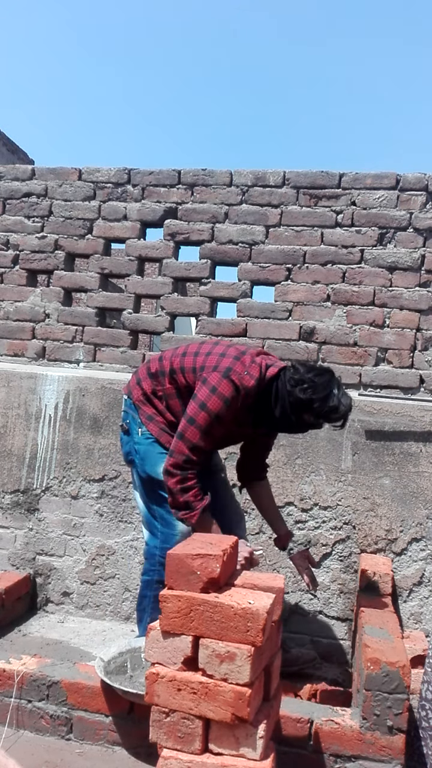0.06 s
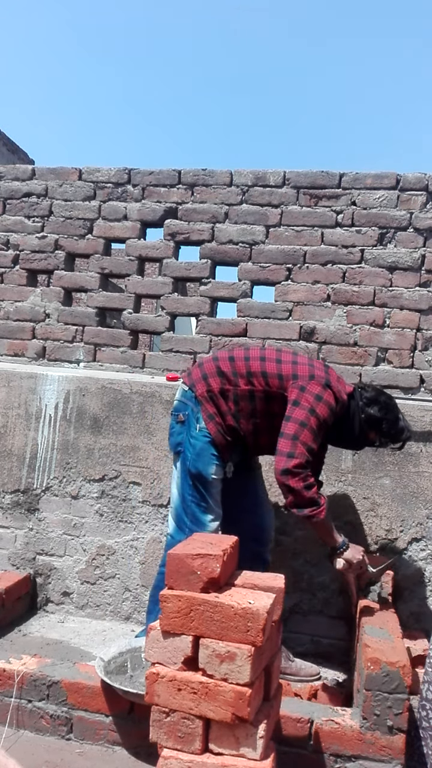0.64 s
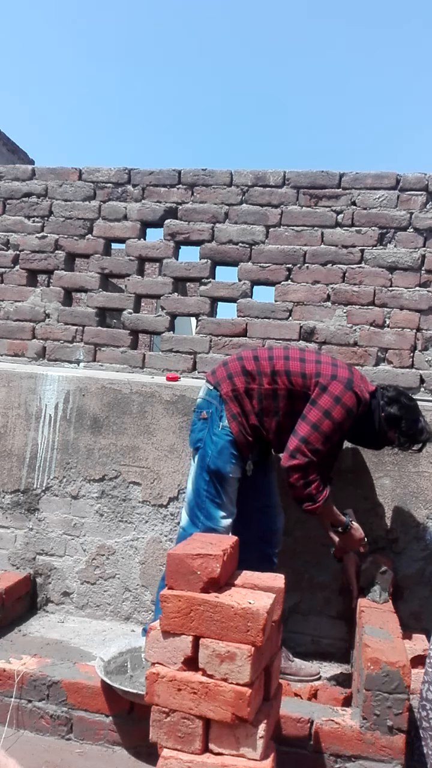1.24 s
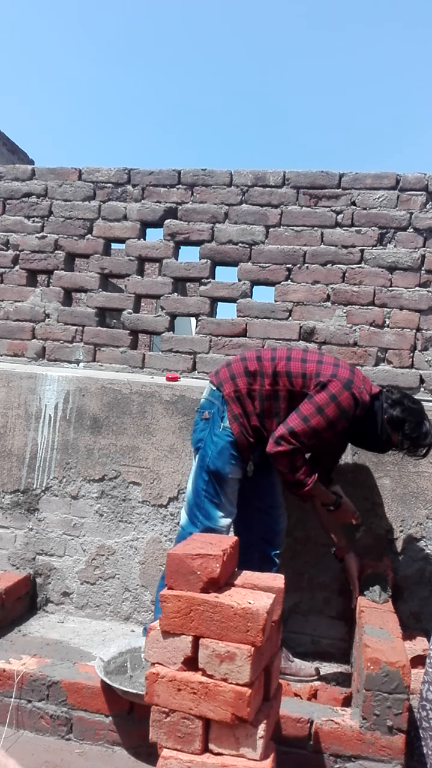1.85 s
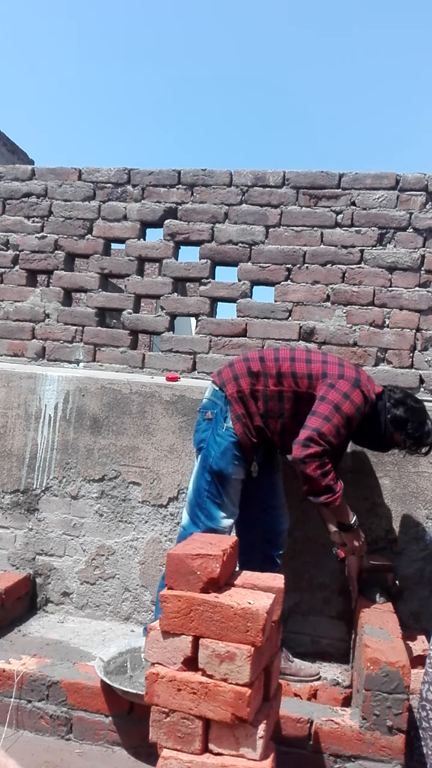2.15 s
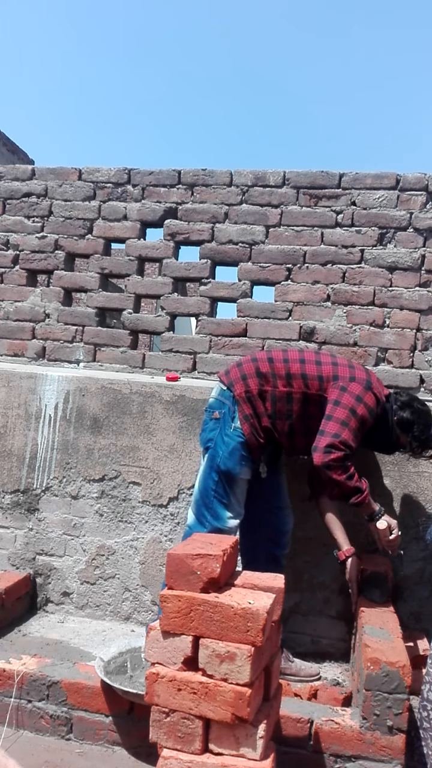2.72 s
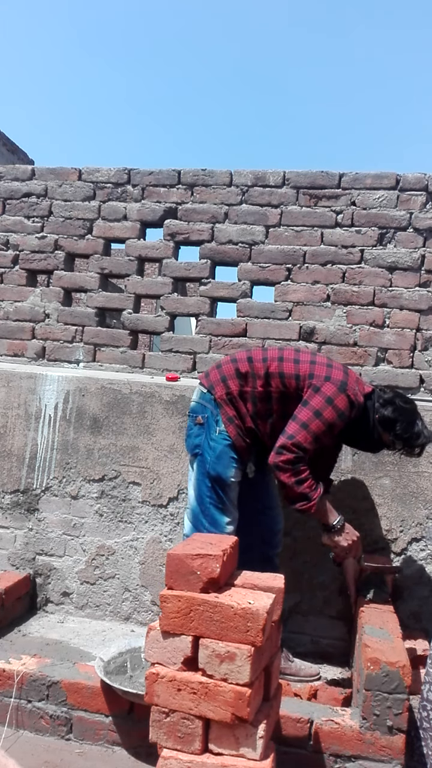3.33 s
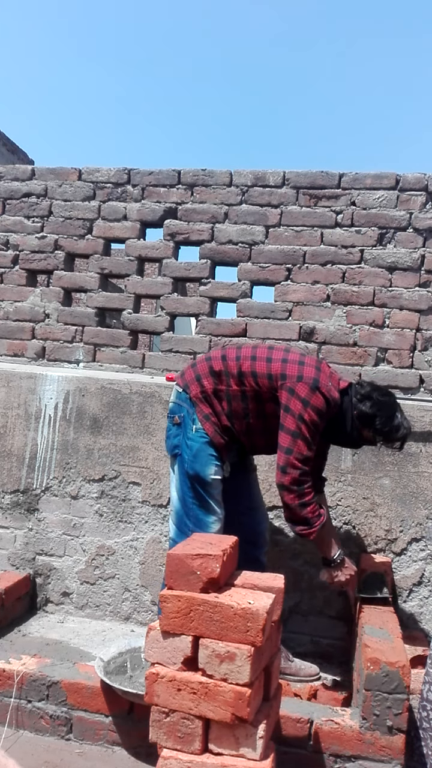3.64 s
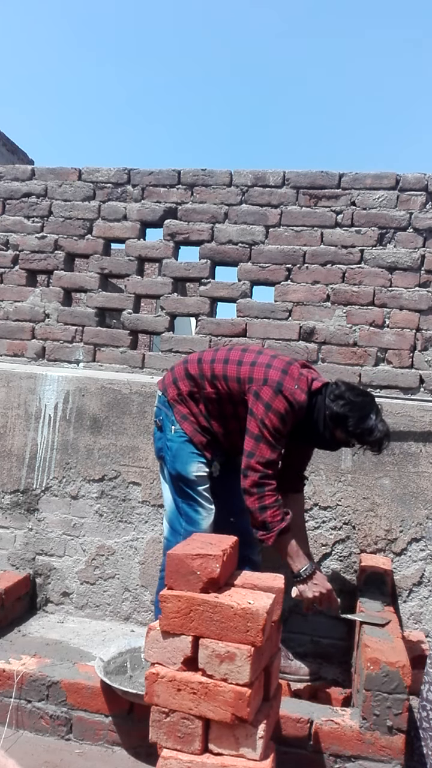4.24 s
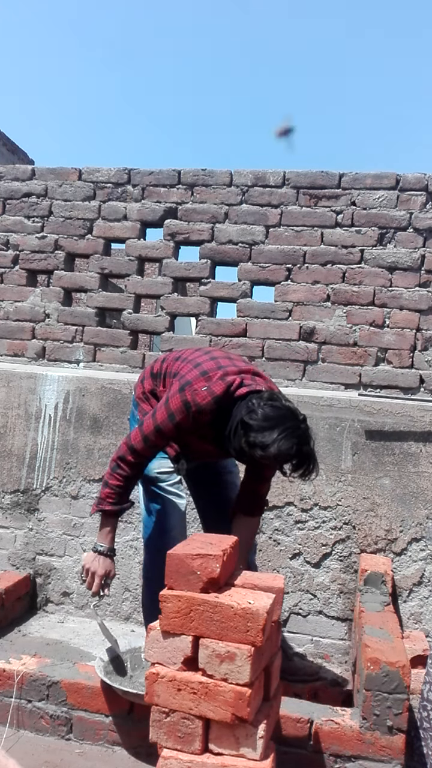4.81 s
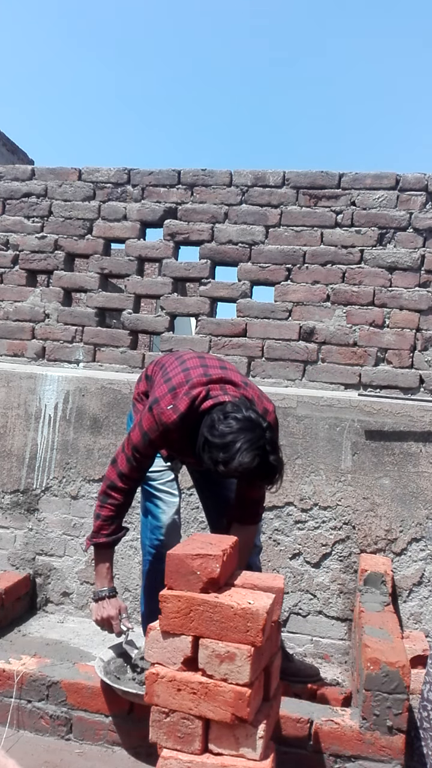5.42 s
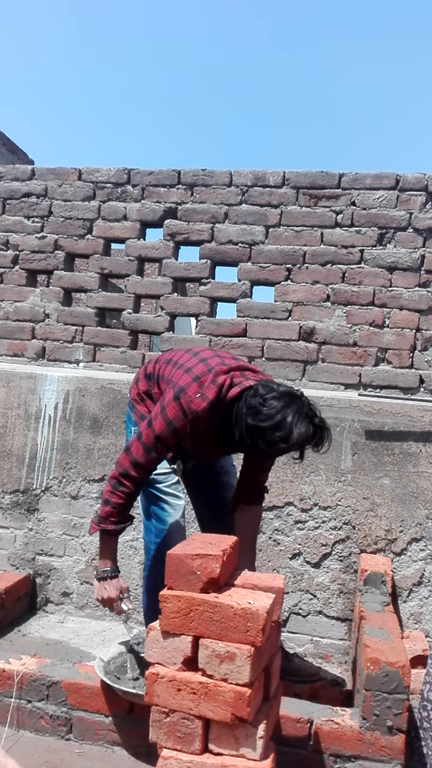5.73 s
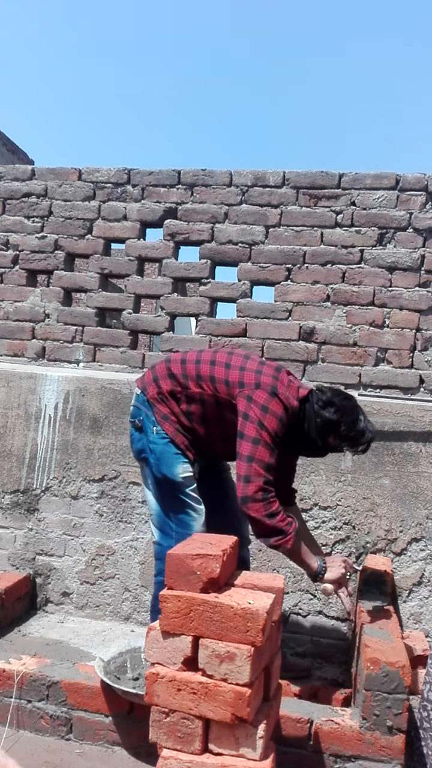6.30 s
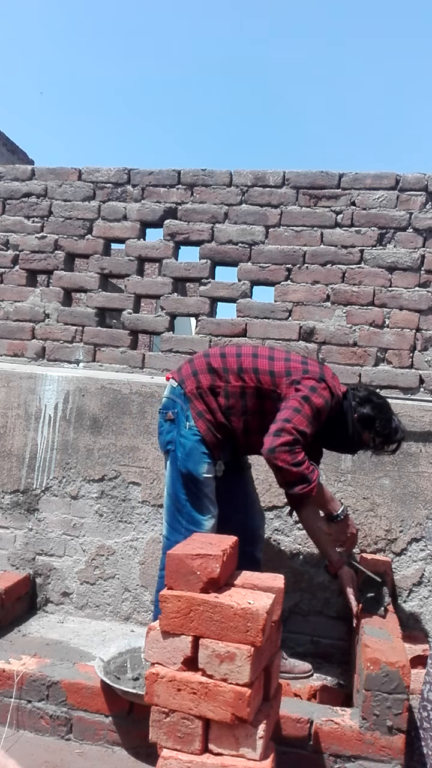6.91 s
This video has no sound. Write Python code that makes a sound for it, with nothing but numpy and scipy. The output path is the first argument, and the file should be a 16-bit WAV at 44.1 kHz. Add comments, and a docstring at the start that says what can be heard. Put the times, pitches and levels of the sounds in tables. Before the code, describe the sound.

A steel trowel knocks and scrapes on brick and scoops mortar from a metal pan, with birds chirping and a light breeze.

```python
"""Bricklaying in a walled corner

A steel trowel smears and pats mortar on to brick, knocks, rasps along an edge, then digs a scoop
from a metal pan: sand cracks under the blade, the metal rings and the walls answer. Birds call
around it in hoarse, wavering tones, a breeze buffets the microphone and the town rumbles far off."""
import sys
import numpy as np
from scipy import signal
from scipy.fft import rfft, irfft
from scipy.io import wavfile

SR = 44100
rng = np.random.default_rng(int(sys.argv[2]) if len(sys.argv) > 2 else 0)


def transcribe(u):
    """Save the signal u as a 16-bit wav file named by the first command-line argument.

    u: samples, shape (n,) or (channels, n), limited to [-1, 1]; the rate is SR.
    q: integer samples, one column per channel.
    """
    v = np.clip(np.atleast_2d(u).T, -1, 1)
    q = np.round(v * 32767).astype(np.int16)
    wavfile.write(sys.argv[1], SR, q)


N = 315756
TIME = np.arange(N) / SR


def from_db(db):
    """Decibels to gain."""
    return 10 ** (np.asarray(db) / 20)


def rms_one(x):
    """Scale to unit rms."""
    return x / np.sqrt(np.mean(np.abs(x) ** 2) + 1e-20)


def drift(rate_hz, size=N):
    """Smooth random modulator of unit rms."""
    pole = np.exp(-2 * np.pi * rate_hz / SR)
    wander = signal.lfilter([1], [1, -2 * pole, pole * pole], rng.standard_normal(size + 8000))
    return rms_one(wander[8000:])


def stroke(start, end, db, attack_s, release_s, swell_db=0):
    """Envelope: a rounded attack up to start, a hold that swells to db at end, an exponential release."""
    early = np.maximum(start - TIME, 0) / attack_s
    late = np.maximum(TIME - end, 0) / release_s
    to_go = np.clip((end - TIME) / max(end - start, 1 / SR), 0, 1)
    return from_db(db - swell_db * to_go) * np.exp(-np.minimum(early ** 2 + late, 30))


def burst(s, db, attack_s, release_s):
    """A stroke with no hold, peaking at s."""
    return stroke(s, s, db, attack_s, release_s)


def colour(x, spectrum, modes=(), ring_db=0, loss_db=0):
    """Unit-power, minimum-phase EQ: a broad curve plus resonances that lose loss_db per octave."""
    hz = np.maximum(np.fft.rfftfreq(8192, 1 / SR), 1)
    curve_hz, curve_db = np.array(spectrum).T
    peaks = sum(from_db(db + ring_db - loss_db * np.log2(f / 2000)) ** 2
                / (1 + (2 * (hz - f) / width) ** 2) for f, width, db in modes)
    gain = from_db(np.interp(np.log(hz), np.log(curve_hz), curve_db)) * np.sqrt(1 + peaks)
    cepstrum = irfft(np.log(gain))
    half = len(cepstrum) // 2
    response = irfft(np.exp(rfft(2 * cepstrum[:half], 2 * half)))[:half]
    return signal.oaconvolve(x, response / np.linalg.norm(response))[:N]


def grains(per_s, spread_db, friction):
    """Sand grains crack under steel, over smooth friction noise."""
    clicks = (rng.random(N) < per_s / SR) * rng.choice([-1, 1], N)
    sizes = from_db(spread_db * np.clip(rng.standard_normal(N), -2, 2))
    return rms_one(rms_one(clicks * sizes) + friction * rng.standard_normal(N))


def moving_echo(x, lag_s, wander, share):
    """The surface under the blade returns a close echo; its changing lag flanges the sound."""
    late = np.interp(TIME - lag_s * (1 + wander * drift(15.6)), TIME, x)
    return (x + share * late) / np.sqrt(1 + share ** 2)


# sub-heavy wind EQ: f/Hz, level/dB
BREEZE_EQ = [(15, 0), (34, 0), (55, -4.5), (82, -11), (110, -8.5), (170, -25), (400, -62.5), (2000, -100)]
# gust peaks: t/s, level/dB
GUSTS = [(0.252, -49), (0.348, -37), (0.665, -43.5), (.97, -48), (1.204, -42), (1.47, -39.5), (1.726, -43),
         (1.985, -50), (2.177, -35.5), (2.3, -45)]

def breeze():
    """Wind buffets the microphone: short gusts over a slowly easing bed."""
    bed = from_db(-52 - .5 * TIME)
    gusts = sum(from_db(db) * np.exp(-((TIME - s) / .05) ** 2) for s, db in GUSTS)
    return (bed + gusts) * colour(rng.standard_normal(N), BREEZE_EQ)


# low-end EQ of the town: f/Hz, level/dB
RUMBLE_EQ = [(50, -10.5), (115, 5.5), (190, 0), (260, -5), (340, -8.5), (450, -22), (800, -36),
             (3000, -73.5)]
# its booming resonances: f/Hz, width/Hz, level/dB
RUMBLE_MODES = [(137, 19, -1), (195, 14, 4), (328, 7, -3)]
# soft thuds: t/s, level/dB, decay/s
THUDS = [(1.2, -63.5, 0.1), (5.33, -49.5, 0.063), (6.04, -45, 0.12), (6.52, -49, 0.1), (6.91, -51, 0.41)]

def town_rumble():
    """The far town is a bed of low noise with dull thuds swelling out of it."""
    thuds = sum(burst(s, db, attack_s=.05, release_s=decay) for s, db, decay in THUDS)
    return (from_db(-63.5) + thuds) * colour(rng.standard_normal(N), RUMBLE_EQ, RUMBLE_MODES, ring_db=1)


# open-air EQ: f/Hz, level/dB
AIR_EQ = [(240, -24.5), (400, -4), (962, -6), (1670, -5.5), (2530, -11), (3780, -12.5), (14000, -22)]

def air():
    """A faint, steady outdoor hiss."""
    return from_db(-70) * colour(rng.standard_normal(N), AIR_EQ)


# syllables of a sharp chip: t/s, f/Hz, level/dB
CHIP_SYLLABLES = [(0.194, 3177, -37), (0.232, 3387, -33)]
# its partials: multiple of the pitch, level/dB
CHIP_PARTIALS = [(1, -11), (1.5, -9), (2, 5), (3, -9), (3.5, -33)]

def near_bird(trill_hz=61.93, rise_hz_per_s=2700, attack_s=.014):
    """A harsh chip: the pitch rises and shakes, the octave leads and half-harmonics add rasp."""
    shake = .045 * np.sin(2 * np.pi * trill_hz * TIME) + .0642 * drift(970)
    flutter = from_db(4.5 * drift(720))
    out = np.zeros(N)
    for s, hz, db in CHIP_SYLLABLES:
        pitch = hz + rise_hz_per_s * np.clip(TIME - s, -2 * attack_s, 0)
        phase = 2 * np.pi * np.cumsum(pitch * (1 + shake)) / SR
        tone = sum(from_db(part_db) * np.sin(multiple * phase) for multiple, part_db in CHIP_PARTIALS)
        out += burst(s, db, attack_s, release_s=.02) * rms_one(tone * flutter)
    return out


def call(s, length_s, pitch_hz, db, fall, hoarse_hz):
    """An arched whistle with a faint octave, roughened by fast random shaking of its pitch."""
    progress = np.linspace(0, 1, int(length_s * SR))
    size, at = len(progress), round(s * SR)
    arch = 4 * progress * (1 - progress)
    hz = pitch_hz * (1 + fall * (.5 - progress) + .025 * arch) + hoarse_hz * drift(330, SR)[:size]
    swell = np.sqrt(arch) * from_db(db + 3.5 * drift(110, SR)[:size])
    phase = 2 * np.pi * np.cumsum(hz) / SR
    tone = np.sin(phase) + from_db(-22) * np.sin(2 * phase)
    out = np.zeros(N)
    out[at:at + size] = (swell * tone)[:N - at]
    return out


# hoarse chatter: t/s, length/s, f/Hz, level/dB
CHATTER = [(.27, 0.19, 3120, -73.5), (.9, 0.34, 4390, -73.5), (.9, 0.37, 3263, -61.5),
           (1.31, 0.32, 3430, -59), (1.53, 0.26, 3100, -65), (1.89, 0.17, 3480, -62.5),
           (2.24, 0.14, 3725, -65.5), (2.76, 0.1, 3415, -65), (3.04, 0.28, 3120, -67),
           (3.177, 0.41, 3420, -67.5), (3.598, .11, 4514, -54.5), (3.73, 0.083, 3340, -61.5),
           (3.95, 0.057, 3357, -58.5), (5.68, 0.27, 4650, -71), (5.91, .2, 2950, -68),
           (5.96, 0.095, 4840, -64.5), (6.09, 0.079, 2430, -60), (6.803, 0.084, 3950, -76)]
# short falling peeps: t/s, f/Hz, level/dB
PEEPS = [(.553, 4640, -51), (.582, 3810, -53), (0.597, 3035, -53.5), (.636, 2830, -65), (1.089, 8600, -66),
         (1.23, 3350, -56.5), (1.84, 8500, -72), (2.08, 2920, -64), (4.0, 2470, -59), (6.41, 2570, -66)]
# one bird's thin, repeated whistle: t/s, level/dB
WHISTLES = [(.73, -76), (3.87, -74.5), (4.58, -69.5), (5.369, -71.5), (6.21, -69.5), (6.55, -85)]
# faint, distant toots: t/s, f/Hz, level/dB
TOOTS = [(1.2, 1376, -74), (1.751, 1900, -75.5), (2.959, 1418, -69), (6.2, 1123, -72.5), (6.84, 1334, -74)]

def far_birds():
    """Four kinds of whistled call; the higher the chatter, the hoarser it gets."""
    chatter = sum(call(s, length, hz, db, fall=.078, hoarse_hz=231 * (hz / 3363) ** 2.6)
                  for s, length, hz, db in CHATTER)
    peeps = sum(call(s, .0744, hz, db, fall=.0604, hoarse_hz=96) for s, hz, db in PEEPS)
    whistles = sum(call(s, .19, 3920, db, fall=.097, hoarse_hz=82.7) for s, db in WHISTLES)
    toots = sum(call(s, .203, hz, db, fall=0, hoarse_hz=48) for s, hz, db in TOOTS)
    return chatter + peeps + whistles + toots


# smearing strokes: start t/s, end t/s, final level/dB, swell/dB
SMEARS = [(.495, 0.546, -53.5, 12), (1.046, 1.703, -73.5, 5), (1.743, 1.845, -63.5, 9),
          (2.876, 2.964, -51, -0.5), (3.284, 3.324, -66, 11), (3.747, 4.183, -58.5, 17.5),
          (4.788, 4.83, -77, 0), (7.075, 7.148, -59.5, 5.5)]
# bright EQ of wet mortar: f/Hz, level/dB
MORTAR_EQ = [(1500, -14), (3000, -3), (6200, -8), (7300, -0.5), (8500, 0), (10500, -2.5), (12500, 1),
             (14500, -3)]

def mortar_smears():
    """Light strokes over wet mortar give a fine, uneven hiss, most growing until the blade lifts."""
    strokes = sum(stroke(start, end, db, attack_s=.01, release_s=.009, swell_db=swell)
                  for start, end, db, swell in SMEARS)
    pressure = strokes * from_db(1.8 * drift(28))
    return colour(pressure * grains(per_s=1900, spread_db=3.5, friction=.77), MORTAR_EQ)


# hits on brick and pan: t/s, knock level/dB, grit level/dB, clink f/Hz
BLOWS = [(0.516, -52.5, -49.5, 2800), (1.157, -50, -63, 3120), (1.191, -52, -63, 3270),
         (1.233, -53, -69, 3380), (1.846, -49.5, -53.5, 4254), (1.848, -56, -76, 1320),
         (2.383, -64, -58, 3480), (2.859, -31, -52, 2150), (2.889, -31.5, -46.5, 3230),
         (2.915, -40, -57, 1430), (2.952, -40, -46.5, 2657), (3.071, -55.5, -59.5, 2990),
         (3.526, -63, -50.5, 3190), (4.112, -45, -47, 2130), (4.971, -51.5, -49, 1930),
         (5.025, -38, -38, 1255), (5.234, -31, -37, 1620), (5.764, -52, -68, 2280),
         (6.358, -52.5, -81, 1780), (6.507, -41, -43.5, 1950), (6.522, -40, -49.5, 2730)]
# EQs of the midrange knock and the crisp grit: f/Hz, level/dB
KNOCK_EQ = [(300, -30), (550, -16), (750, -2), (1400, -1.5), (2200, -3.5), (3200, -1), (4000, -15),
            (8000, -30), (15000, -38.5)]
GRIT_EQ = [(800, -21.5), (2000, -5.5), (4000, -3.5), (6500, -0.5), (9500, -1.5), (12500, -0.5),
           (14500, -2.5)]
# blade resonances, when knocked and when on its edge: f/Hz, width/Hz, level/dB
KNOCK_MODES = [(724, 42, -4.5), (1450, 31, -2), (2120, 42, -2), (2610, 260, -7.5), (3198, 35, -1.5),
               (4320, 53, -14), (5370, 90, -18), (7030, 55, -12), (7660, 52, -19)]
BLADE_EDGE_MODES = [(2266, 28, -1), (2906, 65, -4.5), (3510, 88, 0.5), (4340, 87, -8), (5360, 110, -7.5),
                    (6540, 99, -4), (7280, 110, -2), (8740, 100, -6), (9600, 49, -0.5), (9810, 73, -3),
                    (10500, 53, -3), (11000, 84, -1.5), (12180, 24, -4), (12600, 29, -1.5)]

def trowel_blows(knock_db, grit_db, clink_db):
    """Each blow is a short crush of sand that knocks the blade and sets one of its modes clinking."""
    knock_decay_s, grit_decay_s, clink_t60_s = .0073, .011, .045
    knock, grit, clink = np.zeros((3, N))
    for s, body_db, sand_db, hz in BLOWS:
        at = round(s * SR)
        t = np.minimum(TIME[:N - at], .5)
        knock[at:] += from_db(body_db + knock_db) * np.exp(-t / knock_decay_s)
        grit[at:] += from_db(sand_db + grit_db) * np.exp(-t / grit_decay_s)
        clink[at:] += from_db(body_db + clink_db - 60 * t / clink_t60_s) * np.sin(2 * np.pi * hz * t)
    knock *= grains(per_s=5500, spread_db=6.5, friction=.485)
    grit *= grains(per_s=2700, spread_db=8.5, friction=.4)
    body = colour(knock, KNOCK_EQ, KNOCK_MODES, ring_db=6.5)
    crunch = colour(grit, GRIT_EQ, BLADE_EDGE_MODES, ring_db=6)
    return body + clink + crunch


# swells of engine hum: start t/s, end t/s, level/dB, f/Hz
DRONES = [(1.753, 2.51, -50.5, 106.2), (4.929, 5.02, -53.5, 114)]

def far_motor(waver=.02464, throb_db=6):
    """A far motor's low drone swells, wavers and fades."""
    wavering_time = np.cumsum(1 + waver * drift(8.4)) / SR
    hum = np.zeros(N)
    for start, end, db, hz in DRONES:
        envelope = stroke(start, end, db, attack_s=.1, release_s=.41, swell_db=1)
        hum += envelope * np.sin(2 * np.pi * hz * wavering_time)
    return hum * from_db(throb_db * drift(15))


# EQ of steel on brick: f/Hz, level/dB
RASP_EQ = [(450, -47), (580, -38), (730, -5), (950, -16), (1300, -12.5), (2200, -3.5), (4600, -5),
           (7000, -0.5), (11000, -2.5), (12800, -1), (14300, 0.5)]
# resonances of the blade lying flat: f/Hz, width/Hz, level/dB
BLADE_FLAT_MODES = [(1944, 33, -4), (3527, 61, -1), (4294, 44, -2), (5120, 74, -1), (7700, 110, -1),
                    (9300, 87, -3), (9610, 82, 0), (10480, 99, -1.5), (12000, 42, -2), (12700, 170, -3),
                    (13500, 170, -7.5)]
# accents where the blade catches on brick: t/s, level/dB
RASP_CATCHES = [(4.243, -27), (4.309, -34), (4.329, -33.5)]
CATCH_ATTACK_S, CATCH_RELEASE_S = .01, .02

def brick_rasp(start_s=4.185, end_s=4.335, release_s=.0029, roll_at_s=4.296):
    """Steel chatters along brick, pressed ever harder; its ring shifts as it rolls from flat to edge."""
    pressure = stroke(start_s, end_s, db=-29, attack_s=.005, release_s=release_s, swell_db=10)
    touching = np.exp(-np.clip(TIME - end_s, 0, .1) / release_s)
    catches = touching * sum(burst(s, db, CATCH_ATTACK_S, CATCH_RELEASE_S) for s, db in RASP_CATCHES)
    tilt = .5 + .5 * np.tanh((TIME - roll_at_s) / .0121)
    force = (pressure + catches) * grains(per_s=2200, spread_db=3, friction=.56) * from_db(.8 * drift(90))
    flat = colour(force * np.sqrt(1 - tilt), RASP_EQ, BLADE_FLAT_MODES, ring_db=15.5, loss_db=1.5)
    edge = colour(force * np.sqrt(tilt), RASP_EQ, BLADE_EDGE_MODES, ring_db=14, loss_db=2)
    return moving_echo(flat + from_db(-.5) * edge, lag_s=.000581, wander=.16, share=.54)


# EQs of the pan's body and the sand's hiss: f/Hz, level/dB
PAN_EQ = [(200, -8), (420, -6.5), (600, -9), (900, -8.5), (1500, -0.5), (2200, -5.5), (3000, -6),
          (4000, -16), (8000, -37)]
SAND_EQ = [(1500, -19), (3300, -6), (4400, 1), (5400, -1.5), (6200, -3.5), (8500, -3), (10500, -2),
           (14200, -6)]
# resonances of the loaded pan: f/Hz, width/Hz, level/dB
PAN_MODES = [(1410, 35, -2), (1620, 44, -2), (2514, 34, 1), (2940, 86, -1), (4400, 110, -5),
             (5260, 200, -2), (5580, 37, -12), (6240, 130, -17), (7920, 140, -15), (9630, 110, -14),
             (10400, 52, -11), (11100, 68, -15)]
# accents where the blade catches on lumps: t/s, pan level/dB, hiss level/dB
LUMPS = [(5.10, -54, -47), (5.122, -48, -44), (5.172, -53, -49)]

def pan_scoop(touch_s=4.975, bite_s=5.035, leave_s=5.3, attack_s=.026, release_s=.0057):
    """The blade touches the sand, bites down and ploughs on; the pan rings briefly under each grain."""
    on_pan = stroke(bite_s, leave_s, -45, attack_s, release_s)
    in_sand = stroke(touch_s, leave_s, -53.5, attack_s=.0046, release_s=.01)
    in_sand += stroke(bite_s, leave_s, -55, attack_s, release_s, swell_db=-8)  # the ploughing eases
    for s, pan_db, hiss_db in LUMPS:
        on_pan += burst(s, pan_db, CATCH_ATTACK_S, CATCH_RELEASE_S)
        in_sand += burst(s, hiss_db, CATCH_ATTACK_S, CATCH_RELEASE_S)
    uneven = from_db(.95 * drift(45))
    on_pan *= uneven * grains(per_s=1100, spread_db=3, friction=.35)
    in_sand *= uneven * grains(per_s=1500, spread_db=2, friction=.9)
    body = colour(on_pan, PAN_EQ, PAN_MODES, ring_db=2.5)
    hiss = from_db(-1.5) * colour(in_sand, SAND_EQ, PAN_MODES, ring_db=4.5)
    # the blade moves away from the pan's wall, then back up it
    lag_s = np.interp(TIME, [5.0, 5.13, 5.22], [.00066, .00098, .00058])
    return moving_echo(body + hiss, lag_s, wander=.11, share=.27)


def walls(x, t60_s, wet_db, predelay_s, crossover_hz=3000):
    """Scattered reflections from the brickwork arrive after a gap and die away, the treble first."""
    t, noise = TIME[:SR], rng.standard_normal(SR)
    low = signal.sosfilt(signal.butter(2, crossover_hz, fs=SR, output="sos"), noise)
    high = signal.sosfilt(signal.butter(2, crossover_hz, "high", fs=SR, output="sos"), noise)
    decay_db = -60 * t / t60_s
    tail = (low * from_db(decay_db) - high * from_db(decay_db / .39)) * (t > predelay_s)
    return x + from_db(wet_db) * signal.oaconvolve(x, tail / np.linalg.norm(tail))[:N]


def treble_flicker(x, split_hz, top_hz, side_db):
    """The mix sits in the centre; only the high treble flickers between left and right."""
    treble = signal.sosfilt(signal.butter(10, split_hz, "high", fs=SR, output="sos"), x)
    treble = signal.sosfilt(signal.butter(2, top_hz, fs=SR, output="sos"), treble)
    side = from_db(side_db) * treble * drift(150)
    return np.array([x + side, x - side])


def scene():
    """The trowel up front, the birds wetter and farther off, over a bed of wind and town."""
    blows = trowel_blows(knock_db=-7, grit_db=-1.5, clink_db=-5)
    trowel = blows + brick_rasp() + pan_scoop() + from_db(-2.5) * mortar_smears()
    work = walls(trowel, t60_s=.18, wet_db=-6.5, predelay_s=.004)
    chip = walls(near_bird(), t60_s=.25, wet_db=-1, predelay_s=.0037)
    calls = walls(from_db(-3) * far_birds(), t60_s=.27, wet_db=1.5, predelay_s=.0024)
    bed = from_db(2.5) * (breeze() + town_rumble()) + air() + far_motor()
    return treble_flicker(work + chip + calls + bed, split_hz=7870, top_hz=10000, side_db=-3)


def record(dry):
    """A steep high cut at 14250 Hz."""
    return signal.sosfilt(signal.ellip(12, .1, 80, 14250, fs=SR, output="sos"), dry)


dry = scene()
out = record(dry)
transcribe(out)
```